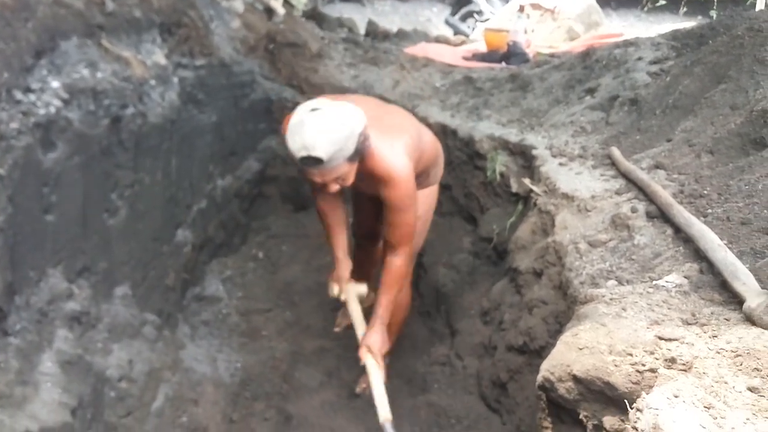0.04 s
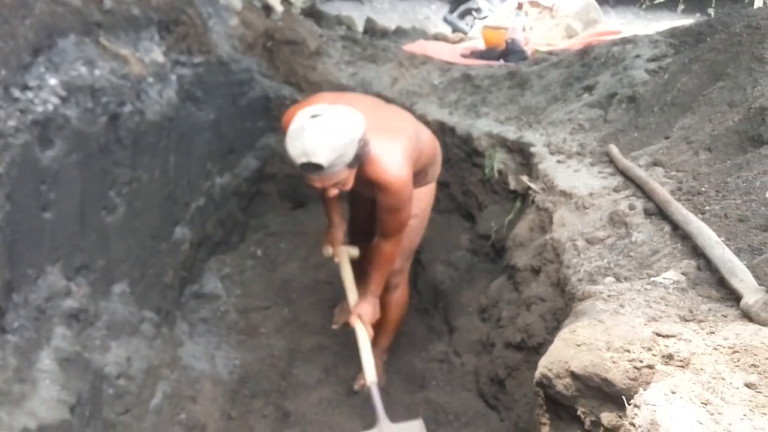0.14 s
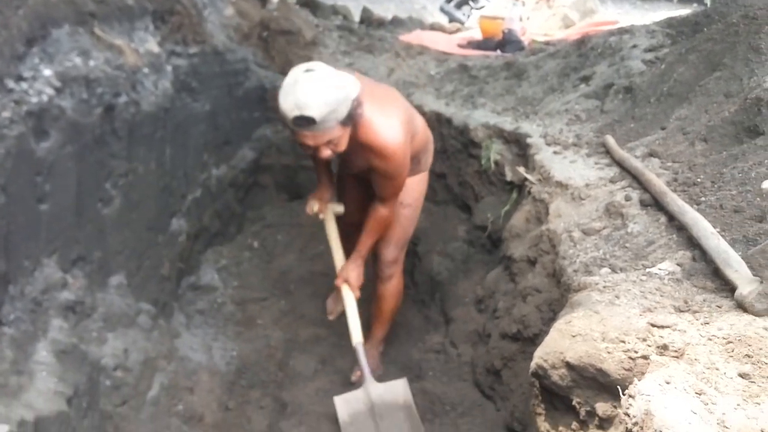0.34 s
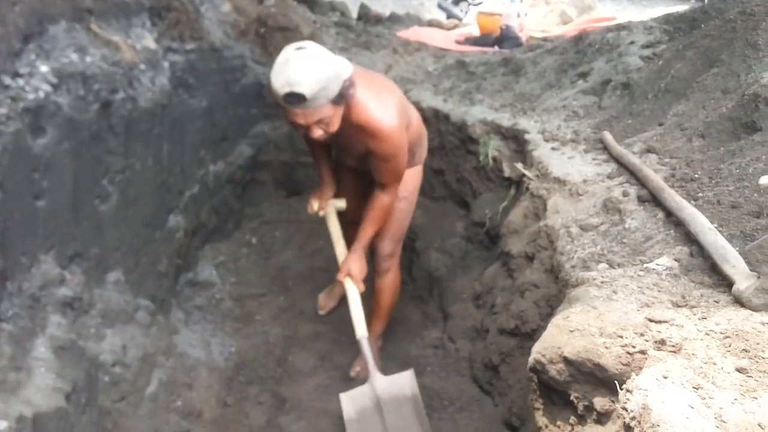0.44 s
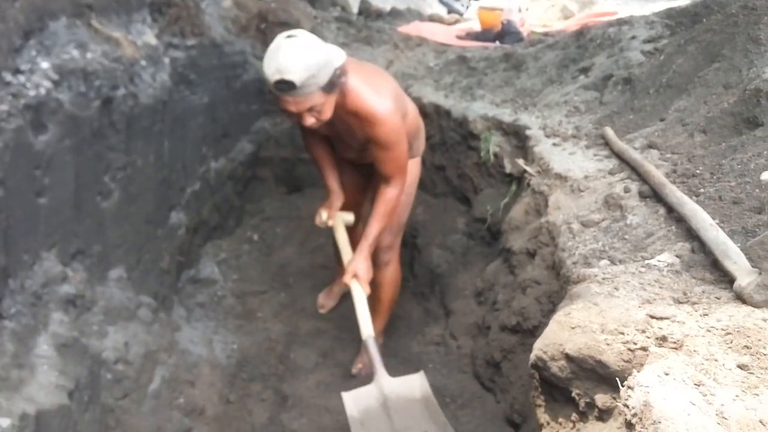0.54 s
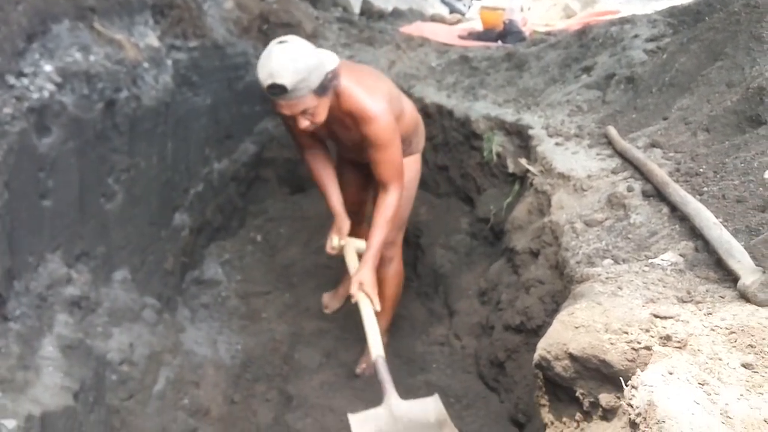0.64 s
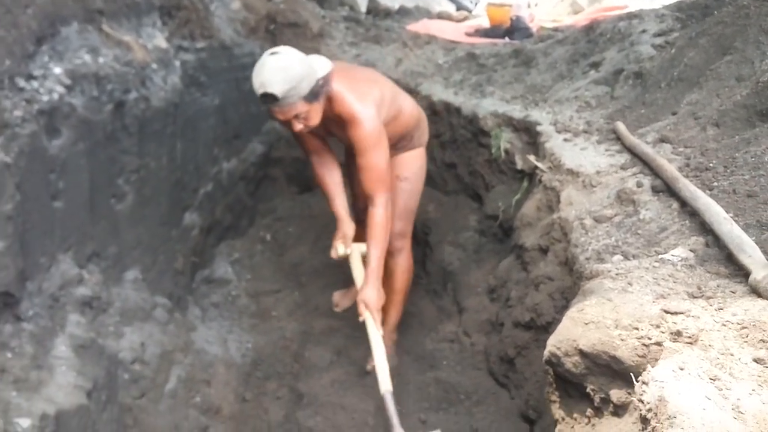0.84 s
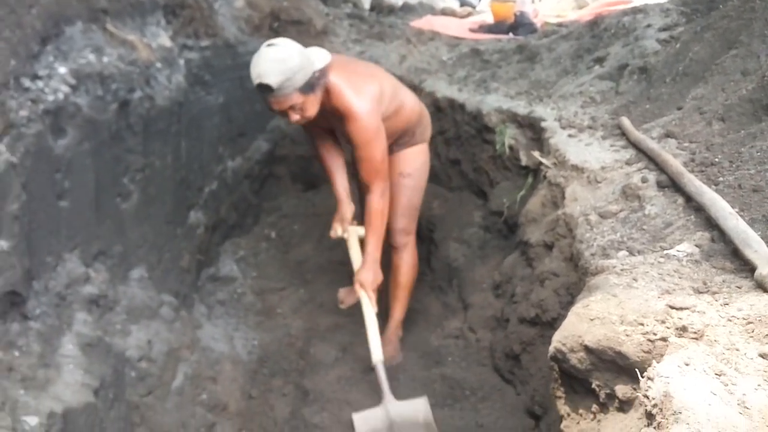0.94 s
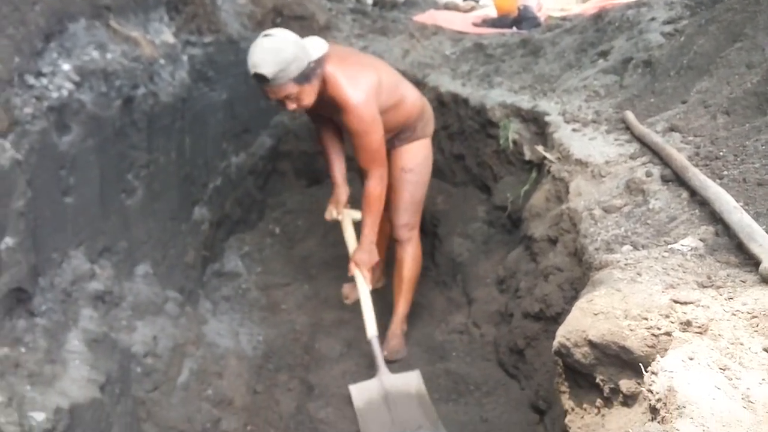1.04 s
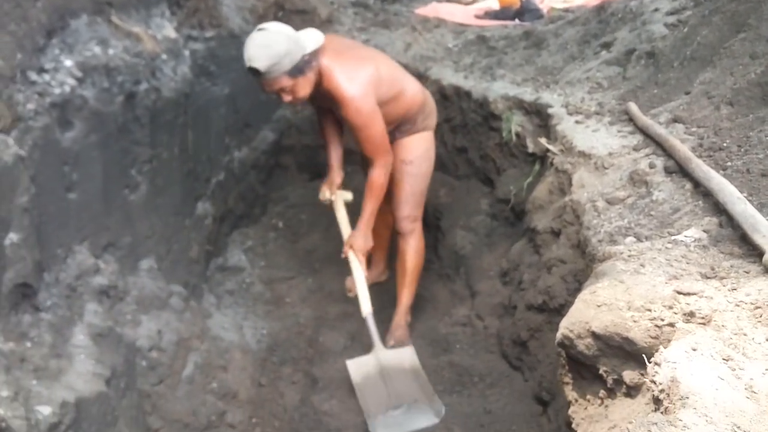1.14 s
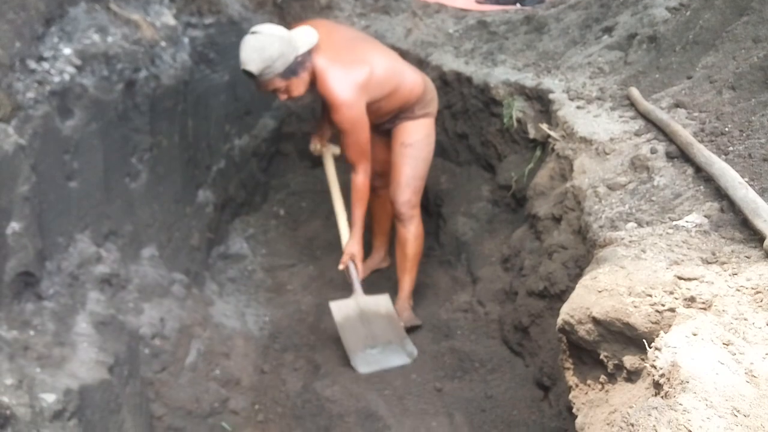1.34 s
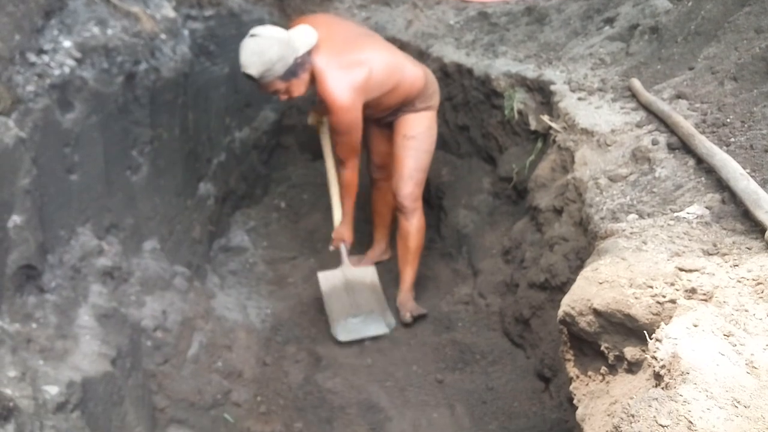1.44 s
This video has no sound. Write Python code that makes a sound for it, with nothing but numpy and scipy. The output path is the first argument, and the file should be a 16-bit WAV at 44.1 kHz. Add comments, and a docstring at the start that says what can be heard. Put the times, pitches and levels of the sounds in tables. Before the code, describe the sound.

A steel shovel clanks into damp sand in an open pit and scrapes briefly. After a pause it lands again, clinks on grit and scrapes longer. It sounds louder on the left, with close dry ticks over faint outdoor rumble.

```python
"""A clank and a crunch: a steel shovel chops into damp sand at the bottom of an open pit and slides on.
It lands again, clinks on grit, is pushed along in two surges and drags on lightly. Blows and rubbing
grains ring the blade, the sand damps it and the pit walls answer briefly. Of the two microphones the
left hears the shovel louder, and a few dry ticks sound close to it. Behind it all lie a faint outdoor
rumble, a thin hiss and one far ting."""
import sys
import numpy as np
from scipy import signal
from scipy.fft import rfft, irfft
from scipy.io import wavfile

SR = 44100
rng = np.random.default_rng(int(sys.argv[2]) if len(sys.argv) > 2 else 0)


def log_audio(samples):
    """Write samples as a 16-bit WAV file to the path given in sys.argv[1]."""
    # one column per channel
    frames = np.atleast_2d(samples).T
    # limit to full scale, then quantise
    limited = np.clip(frames, -1, 1)
    pcm = np.round(limited * 32767).astype(np.int16)
    wavfile.write(sys.argv[1], SR, pcm)


N = 66150
T = np.arange(N) / SR
BINS_HZ = np.maximum(np.arange(N + 1) * SR / (2 * N), 1)

# landings on the pit floor: (time [s], ring [dB], contact cut-off [Hz], thud [dB], knock [dB])
LANDINGS = [(0.2046, -8, 1701, -25, -19.5), (1.0018, -26.5, 1180, -36, -24.5)]
# blade modes: (frequency [Hz], relative level struck [dB], relative level rubbed [dB], t60 [s])
BLADE_MODES = [(474, -18.5, -13.5, 0.035), (556, -8.5, -15, 0.084), (717, 3, -15, 0.051),
               (801, 1.5, -21.5, 0.037), (942, -9.5, -10, .08), (1045, -4.5, -3, 0.12),
               (1130, -0.5, -1.5, 0.1), (1377, -13, -5.5, .1), (1610, -10, -13, 0.1),
               (1768, -2.5, -11, 0.11), (1843, -9, 1, .2), (1968, -7, -9.5, 0.082), (2140, -7, -5, 0.085),
               (2212, -10, -1, .14), (2297, -11, -6.5, .12), (3350, -20.5, -2.5, .2), (3570, -17, 2, .13),
               (3832, -12, -1.5, .13), (4660, -15.5, -15, .16), (4925, -6.5, -8.5, .12),
               (5700, -7.5, 1.5, .08), (6706, -1.5, -7.5, .07)]
# the ground under the blow: (frequency [Hz], relative level [dB])
THUD_SPECTRUM = [(25, -24), (52, -16), (85, 5), (140, -1), (190, -14.5), (290, -3), (500, -7), (1000, -28),
                 (3000, -60)]
# the knock within the clank: (frequency [Hz], relative level [dB])
KNOCK_SPECTRUM = [(120, -19), (280, 1), (450, -1), (600, -5), (770, 2.5), (900, -5), (1300, -6.5),
                  (1600, -19.5), (4000, -46)]

def blows(bounce_s=.0022, bounce_db=-18):
    """The blade lands and bounces once; it clanks with a short knock and the ground thuds."""
    contact = thud_level = knock_level = 0
    for s, ring_db, soft_hz, thud_db, knock_db in LANDINGS:
        hit = click(s) + from_db(bounce_db) * click(s + bounce_s)
        contact += from_db(ring_db) * low_pass(hit, soft_hz, order=2)
        thud_level += from_db(thud_db) * burst(s, attack=.00067, t60=.13)
        knock_level += from_db(knock_db) * burst(s, attack=.00031, t60=.033)
    clank = from_db(-6.5) * ring_modes(contact, [(hz, db, t60) for hz, db, _, t60 in BLADE_MODES])
    thud = sand(THUD_SPECTRUM) * thud_level * pan(db=2.5)
    knock = sand(KNOCK_SPECTRUM) * knock_level
    return clank + knock + thud

# the edge entering the sand: (time [s], level [dB], t60 [s], low-pass [Hz])
CUTS = [(0.2046, -9, 0.07, 4997), (0.9998, -16.5, 0.059, 12800)]
# crushed sand: (frequency [Hz], relative level [dB])
CRUNCH_SPECTRUM = [(150, -17), (400, -12.5), (900, 3.5), (1450, -6.5), (2000, 7), (2900, -6.5), (4000, -2),
                   (5800, 3), (7000, -1), (8100, -8.5), (11000, -8), (15000, -7.5)]

def crunches():
    """A fast-dying spray of crushed grains as the edge goes in."""
    grit = sand(CRUNCH_SPECTRUM)
    return sum(from_db(db) * burst(s, attack=.0041, t60=t60) * low_pass(grit, top_hz, order=1)
               for s, db, t60, top_hz in CUTS)

# the edge meeting small stones: (time [s], level [dB])
STONE_HITS = [(0.2054, -27), (0.4078, -41.5), (1.0035, -14.5)]
# ring of edge on stone: (frequency [Hz], relative level [dB], t60 [s])
EDGE_MODES = [(5790, 0.5, 0.025), (6230, 0, 0.0067), (6370, -6, .022), (7290, -1.5, 0.02),
              (10660, -4, 0.0069), (14400, -9, .008)]

def clinks():
    """Hard contacts ring the short, high modes of the edge."""
    return ring_modes(clicks(STONE_HITS), EDGE_MODES)

# force along the pit floor, one curve per slide: (time [s], level [dB])
SLIDE_FORCES = [
    [(0.215, -80.5), (0.24, -42.5), (0.258, -35.5), (0.278, -31.5), (0.296, -34.5), (0.308, -33.5),
     (0.345, -33.5), (0.376, -37.5), (0.39, -34), (0.44, -50), (0.5, -71), (0.53, -93.5)],
    [(1.02, -24.5), (1.058, -49.5), (1.078, -26), (1.095, -29.5), (1.126, -39.5), (1.148, -33.5),
     (1.18, -29), (1.2, -28.5), (1.245, -27.5), (1.265, -31.5), (1.282, -39.5), (1.34, -45.5), (1.378, -41),
     (1.40, -41), (1.43, -41), (1.47, -42), (1.5, -37.5)],
]
# the edge catching: (time [s], level [dB], half width [s])
EDGE_CATCHES = [(0.311, -35, .007), (1.2420, -22.5, 0.0045)]
# sand hissing on steel: (frequency [Hz], relative level [dB])
SCRAPE_SPECTRUM = [(150, -21), (500, -14.5), (800, -11), (1200, -7), (2200, 2.5), (2900, -1), (3700, 4.5),
                   (5500, -2), (6900, -1), (8100, -12), (11000, -16.5), (15000, -26.5)]

def scrape(judder_db=1.5, judder_hz=54, bright_hz=7500, bright_at_db=-35):
    """Grains rub the steel with a juddering force: they hiss, brighter when pressed, and ring it."""
    force = sum(from_db(np.interp(T, *np.transpose(rows), left=-140, right=-140))
                for rows in SLIDE_FORCES)
    judder = rms_one(low_pass(rng.standard_normal(N), judder_hz, order=2))
    force *= from_db(judder_db * judder)
    catch = swells(EDGE_CATCHES)
    rub = grains() * (from_db(-7.5) * force + from_db(-9.5) * catch)
    # long-ringing modes gather more power from the rubbing, so each is turned down by its decay time
    steel = ring_modes(rub, [(hz, db - 10 * np.log10(t60 * SR), t60) for hz, _, db, t60 in BLADE_MODES])
    grit = sand(SCRAPE_SPECTRUM)
    dull = shaped(grit, 1 / (1 + (BINS_HZ / bright_hz) ** 4))
    brightness = (force / from_db(bright_at_db)) ** .31
    hiss = dull + (grit - dull) * brightness
    return steel + hiss * (from_db(-3.5) * force + from_db(-4.5) * catch)

# squeaking steel: (frequency [Hz], relative level [dB], t60 [s])
SQUEAK_MODES = [(1148, -14, 0.063), (2160, -12, 0.045), (2250, -14.5, 0.14), (3592, -4.5, 0.04),
                (5500, -10.5, 0.014), (7100, -9.5, 0.0092)]

def squeaks():
    """While the edge catches, stick and slip feed a few modes, which then die away."""
    catch = swells(EDGE_CATCHES)
    squeak = 0
    for hz, db, t60 in SQUEAK_MODES:
        swing = ring(catch * np.sin(2 * np.pi * hz * T), hz, t60)
        squeak += from_db(db) * swing * catch.max() / np.abs(swing).max()
    return squeak

# the lifted blade: (frequency [Hz], level [dB], t60 [s])
FREE_MODES = [(1780, -64, .25), (1833, -62, .3), (1980, -65, .22), (2183, -55, 0.12)]

def free_ring(lift_s=.425, rise_s=.011):
    """Out of the sand the blade is no longer damped, and a few modes linger."""
    return sum(from_db(db) * burst(lift_s, rise_s, t60) * np.sin(2 * np.pi * hz * T)
               for hz, db, t60 in FREE_MODES)

# sand moving ahead of the blade: (time [s], level [dB], half width [s])
SAND_SHIFTS = [(0.32, -48.5, 0.049), (1.21, -58.5, 0.11), (1.5, -47, 0.018)]
# its low rustle: (frequency [Hz], relative level [dB])
RUSTLE_SPECTRUM = [(100, -17.5), (300, -5.5), (480, 2.5), (750, -1), (1200, -4), (3000, -30),
                   (12000, -55.5)]

def rustle():
    """Sand shifts in front of the blade in soft swells."""
    return sand(RUSTLE_SPECTRUM) * swells(SAND_SHIFTS)

# bumps in the pit floor: (time [s], level [dB], half width [s])
GROUND_BUMPS = [(0.41, -56.5, 0.035), (0.575, -56, .018), (1.08, -55.5, 0.051), (1.35, -64.5, .02)]
# their dull body: (frequency [Hz], relative level [dB])
BUMP_SPECTRUM = [(25, -25), (65, 4.5), (140, 1.5), (300, -12.5), (900, -30), (8000, -70)]

def bumps():
    """Shifting weight and sliding sand bump quietly through the ground."""
    return sand(BUMP_SPECTRUM) * swells(GROUND_BUMPS)

# close by the left microphone: (time [s], peak level [dB])
CLOSE_TICKS = [(0.9935, -10.5), (1.0791, -7), (1.0880, -5), (1.2095, -8.5), (1.2200, -12), (1.2533, -11),
               (1.2614, -6.5)]

def ticks(low_hz=1910, top_hz=6470, right_db=-37):
    """Dry ticks of about two cycles, almost only at the left microphone."""
    high_pass = signal.butter(3, low_hz, "high", fs=SR, output="sos")
    tick = low_pass(signal.sosfilt(high_pass, click(0)), top_hz, order=12)
    left = signal.fftconvolve(clicks(CLOSE_TICKS), tick / np.abs(tick).max())[:N]
    return np.array([left, from_db(right_db) * left])

def pit_echo(x, delay_s=.0037, t60=.13, level_db=-18):
    """Rough sand walls nearby scatter a short, dull echo to each microphone."""
    scatter = low_pass(rng.standard_normal((2, N)), hz=8800, order=2)
    echo = rms_one(scatter * burst(delay_s, attack=.00088, t60=t60)) / np.sqrt(N)
    return from_db(level_db) * signal.fftconvolve(x, echo, axes=1)[:, :N]

# open air around the pit: (frequency [Hz], relative level [dB], left minus right [dB])
AIR_SPECTRUM = [(20, -16.5, -0.5), (45, -14, 1), (70, 4, 8), (140, -2.5, 3), (220, -12, -5),
                (460, -19, -11), (1000, -27, -3.5), (2200, -30.5, -1), (3500, -31.5, 0), (5400, -29.5, 9.5),
                (7020, -34, 6), (8600, -45, 4), (15000, -49.5, 3)]

def rumble(level_db=-57.5):
    """Faint, steady outdoor rumble at both microphones."""
    colour = from_db(over_hz(AIR_SPECTRUM)) * pan(over_hz(AIR_SPECTRUM, column=2))
    return from_db(level_db) * rms_one(shaped(rng.standard_normal((2, N)), colour))

# thin hiss in the background: (time [s], level [dB])
HISS_LEVELS = [(0, -71), (.17, -64.5), (.55, -78.5), (.85, -78.5), (1.5, -65)]

def high_hiss():
    """A high band of noise that sinks midway and returns."""
    band = ring(rng.standard_normal((2, N + 1)), hz=5330, t60=.006)
    hiss = low_pass(np.diff(band), hz=6100, order=4)
    return from_db(np.interp(T, *np.transpose(HISS_LEVELS))) * rms_one(hiss)

def far_ting(start_s=.565, level_db=-72):
    """One faint ting in the distance, a narrow band of noise dying away."""
    tone = low_pass(ring(rng.standard_normal(N), hz=4500, t60=.04), hz=7000, order=4)
    return from_db(level_db) * burst(start_s, attack=.0083, t60=.38) * rms_one(tone)

# the shovel at the microphone pair: (frequency [Hz], likeness [0-1], left minus right [dB])
MIC_PAIR = [(80, .7, 18), (400, 0.2, 11), (990, 0.7, 8), (2000, 0.8, 5), (3960, 0, 10), (6500, 0, 8),
            (9000, .05, 2.5), (15000, 0, 3)]

def at_microphones(x):
    """The shovel arrives louder on the left, most of all in the bass."""
    return shaped(x, pan(over_hz(MIC_PAIR, column=2)))

def sand(spectrum):
    """Coloured grains at two microphones, partly alike lower down and unrelated in the treble."""
    alike, left = over_hz(MIC_PAIR), grains()
    right = shaped(left, alike) + shaped(grains(), np.sqrt(1 - alike ** 2))
    return rms_one(shaped(np.array([left, right]), from_db(over_hz(spectrum))))

def grains(per_s=24000, spread_db=2.5):
    """Dense tiny collisions of uneven size."""
    sizes = from_db(spread_db * np.minimum(rng.exponential(1, N), 5))
    signs = rng.choice([-1, 1], N)
    return rms_one(sizes * signs * (rng.random(N) < per_s / SR))

def ring(x, hz, t60):
    """One mode: a unit click sets a sine of height 1 ringing."""
    r, w = 1000 ** (-1 / (t60 * SR)), 2 * np.pi * hz / SR
    return signal.lfilter([0, np.sin(w)], [1, -2 * r * np.cos(w), r * r], x + 1e-18)

def ring_modes(x, modes):
    """One force drives several modes of alternating sign."""
    return sum((-1) ** k * from_db(db) * ring(x, hz, t60) for k, (hz, db, t60) in enumerate(modes))

def click(s):
    """A unit impulse at a time."""
    return (np.arange(N) == int(s * SR)) * 1.

def clicks(rows):
    """Impulses at given times and levels."""
    return sum(from_db(db) * click(s) for s, db in rows)

def burst(s, attack, t60):
    """Straight rise, exponential fall."""
    return np.clip((T - s) / attack, 0, 1) * 1000 ** (-np.maximum(T - s - attack, 0) / t60)

def swells(rows):
    """Bell-shaped rises and falls."""
    return sum(from_db(db) * np.exp(-.5 * ((T - s) / half) ** 2) for s, db, half in rows)

def over_hz(table, column=1):
    """One column of a table, joined on a log-frequency axis."""
    rows = np.array(table)
    return np.interp(np.log(BINS_HZ), np.log(rows[:, 0]), rows[:, column])

def shaped(x, gain):
    """Filter by a smooth gain curve."""
    return irfft(rfft(x, 2 * N) * gain)[..., :N]

def low_pass(x, hz, order):
    """Butterworth low-pass."""
    return signal.sosfilt(signal.butter(order, hz, fs=SR, output="sos"), x)

def pan(db):
    """Left and right gains for a level difference, with a mean of 1."""
    sides = from_db(db * np.array([[.5], [-.5]]))
    return sides / sides.mean(axis=0)

def from_db(db):
    """Decibels to gain."""
    return 10 ** (np.asarray(db) / 20)

def rms_one(x):
    """Scale to unit power."""
    return x / np.sqrt(np.mean(x ** 2) + 1e-20)

def scene():
    """The shovel down in the pit, the ticks close on the left and the open air behind."""
    shovel = blows() + crunches() + clinks() + scrape() + squeaks() + free_ring() + rustle() + bumps()
    shovel = at_microphones(shovel + pit_echo(shovel))
    air = rumble() + (high_hiss() + far_ting()) * pan(db=11.5)
    return shovel + ticks() + air

def record(dry):
    """Peaks clip at full scale and the top is cut above 15.3 kHz."""
    top_cut = signal.ellip(10, .2, 80, 15300, fs=SR, output="sos")
    return signal.sosfilt(top_cut, np.clip(dry, -1, 1))

dry = scene()
out = record(dry)
log_audio(out)
```